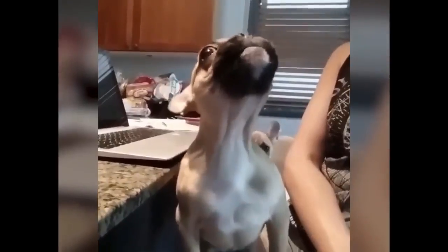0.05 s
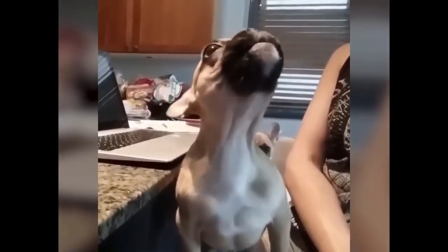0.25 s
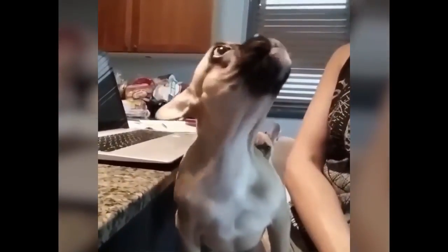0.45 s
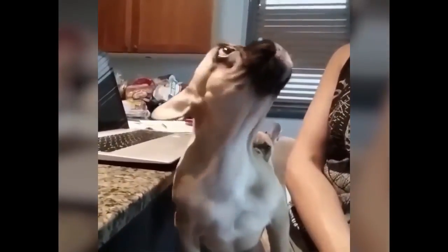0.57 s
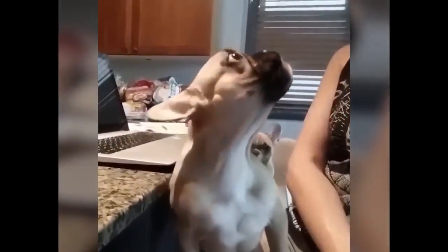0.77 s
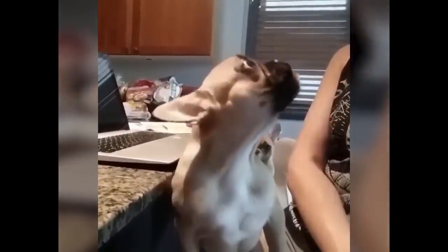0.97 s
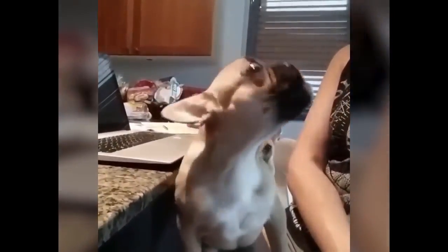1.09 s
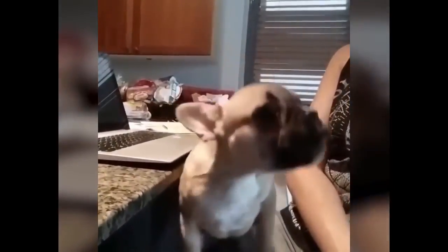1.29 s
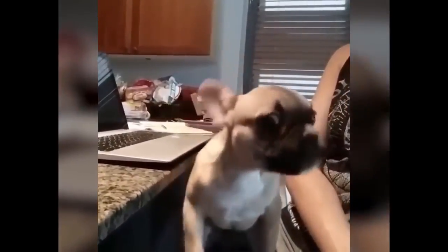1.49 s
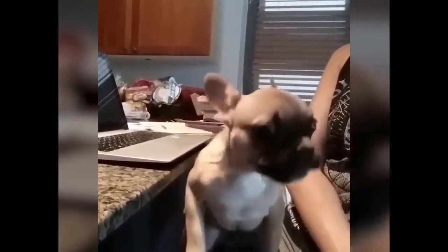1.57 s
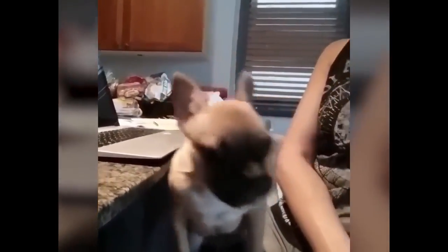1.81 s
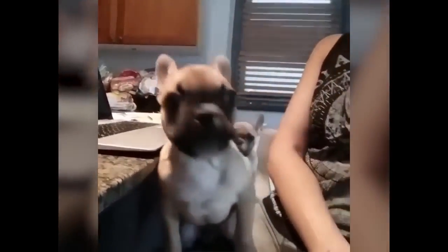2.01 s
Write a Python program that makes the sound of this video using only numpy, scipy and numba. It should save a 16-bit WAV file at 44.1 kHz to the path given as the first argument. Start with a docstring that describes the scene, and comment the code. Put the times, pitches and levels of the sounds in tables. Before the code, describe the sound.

A puppy yowls close to a phone microphone in a small kitchen. After faint room noise and the dying ring of an earlier howl, a hoarse yelp starts at 0.2 s, drops, leaps up again near 0.5 s, then clears into a falling howl until 1.1 s. After a short pause, a rougher, brighter yowl rises and breaks twice from 1.3 to 1.9 s, leaving a short room tail.

```python
"""Puppy yowling in a small kitchen

Two yowls close to a phone's microphone: hoarse onsets, pitch breaks, half-pitch lines, a clear falling howl.
Vocal-fold pulses and breath noise pass through moving mouth, rasp and treble resonances.
The room answers with a short decaying tail, over a faint dull noise floor and the ring of an earlier howl.
The phone turns down the bass under loud sound and cuts the top."""
import sys
import numpy as np
from scipy import signal
from scipy.fft import rfft, irfft
from scipy.io import wavfile
from scipy.ndimage import uniform_filter1d
from numba import njit

SR = 44100
rng = np.random.default_rng(int(sys.argv[2]) if len(sys.argv) > 2 else 0)


def materialize(psi):
    """Save the field psi as 16-bit PCM at rate SR to the path in sys.argv[1].

    A 1-D psi becomes a single channel; in a 2-D psi each row is a channel.
    """
    bounded = np.clip(np.atleast_2d(psi).T, -1, 1)
    quanta = np.round(bounded * 32767).astype(np.int16)
    wavfile.write(sys.argv[1], SR, quanta)


def ratio_of_db(decibels):
    """Turn decibels (scalar or array-like) into linear amplitude factors; 0 dB maps to 1."""
    return 10 ** (np.asarray(decibels, float) / 20)


N = 90404   # length [samples]

# Vocal folds: (time [s], mean pitch [Hz], roughness [0-1], half-pitch lines against pitch lines [dB])
VOCAL_FOLDS = [(.2, 820, 0.75, 23), (.243, 897.5, 0.48, 1), (.275, 670.3, 0.79, 0),
               (.32, 616.2, 0.54, -35.5), (.372, 517, 0.22, -29), (.382, 275.1, 0.3, -33),
               (.462, 396.3, 0.12, -82), (.488, 463.5, 0.13, 3), (.496, 718.5, 0.39, -4),
               (.522, 879.8, 0.05, -0.5), (.56, 771, 0.33, -3.5), (.568, 510.2, 0.41, 7),
               (.614, 500, 0.64, -5.5), (.64, 437, 0.18, -38.5), (.686, 376.2, 0, -38.5),
               (.798, 421.7, 0.08, -39), (.873, 392.7, .02, -65.5), (1.07, 305.8, 0.14, -63.5),
               (1.3, 499.9, 0.7, 14), (1.385, 681.3, 0.82, -23.5), (1.412, 641.5, 0.49, -9),
               (1.424, 472.7, 0.3, -26), (1.456, 423.2, 0.11, -31.5), (1.495, 460.8, 0.27, -9),
               (1.545, 472.9, 0.06, -4.5), (1.558, 570.3, 0.21, -18), (1.605, 766.6, 0.73, -8.5),
               (1.652, 735.2, 0.35, -2), (1.706, 657.2, 0.3, 0), (1.752, 634.6, 0.4, -2.5),
               (1.775, 524.4, 0.5, -28), (1.8, 426.2, 0.06, -31), (1.85, 388.8, 0.1, -34)]
# Effort of the voice: (time [s], mouth level [dB], rasp level [dB], treble level [dB])
EFFORT_LEVELS = [(.202,-90,-87,-88),(.21,-41,-72,-61.5),(.218,-22,-59,-51.5),(.246,-16.5,-40.5,-36),(.268,-22,-25.5,-32.5),
                 (.336,-26.5,-39.5,-37),(.378,-31.5,-48,-48.5),(.448,-27.5,-49,-40),(.485,-21,-40,-36),(.497,-19.5,-27.5,-34),(.526,-14.5,-26,-27.5),
                 (.56,-19.5,-20,-27.5),(.58,-19,-24,-29),(.62,-21.5,-34,-38),(.656,-35,-50,-43),(.72,-29,-63,-45),
                 (.754,-27,-40.5,-46),(.786,-20,-43,-43),(.83,-27,-46.5,-46.5),(.928,-29,-59.5,-52.5),(1.06,-37,-66.5,-60.5),
                 (1.085,-90.5,-88,-68.5),(1.303,-75.5,-100,-100),(1.314,-32.5,-66.5,-66),(1.334,-20.5,-39.5,-46.5),(1.378,-22.5,-35.5,-35),
                 (1.434,-25,-36.5,-35.5),(1.514,-29,-48,-41.5),(1.586,-16.5,-26.5,-27),
                 (1.624,-16,-28,-25.5),(1.648,-25,-26.5,-20.5),(1.704,-21.5,-27.5,-28),(1.764,-22.5,-35.5,-35.5),
                 (1.79,-35.5,-45.5,-38),(1.834,-32,-54,-55),(1.885,-50,-53,-50.5),(1.91,-60,-59.5,-74.5),(2.05,-75,-74.5,-78)]
# Mouth shape: (time [s], first resonance [Hz], its height [dB], second resonance [Hz], its height [dB],
# rasp resonance [Hz])
MOUTH_SHAPE = [(.24,815,20,1376,7.5,3640),(.28,1134,16,1220,3,3600),(.335,597,23,1200,33,3930),
               (.375,556,13.5,1240,-26,3300),(.47,760,3,1950,3,2730),(.525,805,28.5,1150,-2.5,2930),(.585,996,16.5,1340,-1,3044),
               (.7,835,7.5,1790,-9,3220),(.77,784.4,12,1946,19.5,3080),(.84,780,4.5,1980,9,3260),(.9,744,9.5,1497,8,3520),
               (1.07,630,8,1208,-13.5,3550),(1.31,736,7,1082,-2.5,2530),(1.35,960,16.5,1470,12,3200),(1.41,1310,21.5,1670,-17,3300),
               (1.44,924,19,1194,32,3030),(1.47,860,15,1401,17,2340),(1.51,870,9,1670,-1.5,2340),(1.565,833,10,1330,-6,2820),(1.622,1120,26,1620,-1,3640),
               (1.66,810,19,1533,22.5,3500),(1.71,650,5,1270,14.5,2880),(1.76,670,7.5,1090,15,2590),(1.83,816,-8,1520,-17,2800)]
# Treble resonances before the head turns: (mean centre [Hz], width of the first pass [Hz], relative level [dB])
TREBLE_RESONANCES = [(6050,380,-3),(7450,480,-2),(8600,600,-7),(10700,700,-5),(12300,900,-4),(13400,600,-7)]
# Spectrum of the room's noise floor: (frequency [Hz], relative level [dB])
FLOOR_SPECTRUM = [(25, -8), (134, -3.5), (716, -14.5), (831, -31.5), (924, -18.5), (4000, -43.5),
                  (5200, -107)]

# Room and background
EARLIER_HZ, EARLIER_WIDTH_HZ = 820, 74   # ring of an earlier howl; width of each of two passes
EARLIER_START_DB, EARLIER_FALL_DB_PER_S = -60.5, 60.5
FLOOR_DB, FLOOR_SIDE_DB = -61.5, -19   # in the middle; sides against the middle
ROOM_T60_S, ROOM_DB, WALL_CUT_HZ = 0.37, -13, 8800
SIDE_DB, SIDE_LAG_S, SIDE_BASS_DB = -22, .003, -23   # the dog's late upper part and its bass echoes

# Vocal folds and breath
JITTER, JITTER_HZ, SHIMMER_DB, SHIMMER_HZ = .09, 150, 4, 110   # pitch and strength wander at full roughness
LOWEST_HALF_DB = -6   # the lowest half-pitch line is weaker than the others
AIR_DB = -2   # breath noise at full roughness
TREBLE_AIR_DB, STEADY_AIR = 7, .22   # breath feeding the treble; the share that needs no roughness
PULSE_TOP_HZ = 7300   # pulses fade into air above this
GROWL_HZ, GROWL_DB = 194, -30.5

# Mouth and rasp
FIRST_WIDTH_HZ, SECOND_WIDTH_HZ = 245, 167   # of the first pass
THROAT_TILT_HZ, CHEST_HZ, MOUTH_TOP_HZ = 1100, 270, 2120   # throat low-pass; low and high edge of the voice
UPPER_RASP_HZ, UPPER_RASP_DB, RASP_WIDTH_HZ = 4180, -21.5, 260
RASP_AIR, RASP_WIDE_DB = .38, -11   # share of air in the rasp resonance; broad air around it
RASP_FADES_DB = -42   # below this mouth level the rasp resonance loses to the air around it
CLEAR_TOP_HZ = 3850   # upper edge of the rasp in a clear voice before the turn

# Treble, and the turn of the head between the yowls
TREBLE_FROM_HZ, TREBLE_WANDER, TREBLE_WANDER_HZ = 5400, .012, 11
TURN_S, TURN_DB_PER_KHZ = 1.26, 1.3   # the second yowl is brighter
RING_FOLLOWS, RING_FROM_DB = 1, -26.5   # lowest treble resonance: dB lost per dB of voice below this level
DIP_HZ, TURNED_DIP_HZ, DIP_WIDTH_HZ = 4950, 6150, 1300   # dip in the voice's spectrum, higher after the turn
DIP_FILL = 2.2   # how readily hoarseness fills the dip and opens the rasp before the turn

# Phone
DUCK_HZ, DUCK_FROM_DB, DUCK_RATIO, DUCK_S = 176, -34.5, 0.55, 0.03   # ratio: bass dB lost per dB of excess
TOP_STOP_HZ = 14200   # the top is down 26 dB from here


def rms_one(x):
    """Scale to rms 1."""
    return x / np.sqrt(np.mean(x ** 2) + 1e-20)


def in_time(rows):
    """Columns of a table, joined by straight lines sample by sample."""
    s, *columns = np.transpose(rows)
    return [np.interp(np.arange(N) / SR, s, c) for c in columns]


def cut(x, hz, kind, order=2):
    """Butterworth filter."""
    return signal.sosfilt(signal.butter(order, hz, kind, fs=SR, output="sos"), x)


def drift(hz):
    """Smooth random wandering of rms 1, slower than hz."""
    return rms_one(cut(rng.standard_normal(N), hz, "low"))


def evened(x):
    """Level held near 1, followed over some 30 ms."""
    power = uniform_filter1d(uniform_filter1d(x ** 2, size=1300), size=700)
    return x / np.sqrt(power + 1e-12)


@njit
def sweep(x, c, r):
    """Two-pole resonance with a moving centre: c is the cosine of its angle, r the pole radius."""
    y = np.zeros(len(x))
    for i in range(2, len(x)):
        y[i] = (1 - r * r) / 2 * (x[i] - x[i - 2]) + 2 * r * c[i] * y[i - 1] - r * r * y[i - 2]
    return y


def resonance(x, hz, width_hz):
    """A resonance with gain 1 on top; its centre may be fixed or move."""
    return sweep(x, np.cos(2 * np.pi * hz / SR) * np.ones(N), np.exp(-np.pi * width_hz / SR))


def twice(x, hz, width_hz):
    """A steep resonance: two passes, the second twice as wide."""
    return resonance(resonance(x, hz, width_hz), hz, 2 * width_hz)


def earlier_howl():
    """The dying ring of a howl from just before: narrow noise falling steadily in level."""
    ring = rng.standard_normal(N)
    for _ in range(2):
        ring = resonance(ring, EARLIER_HZ, EARLIER_WIDTH_HZ)
    return rms_one(ring) * ratio_of_db(EARLIER_START_DB - EARLIER_FALL_DB_PER_S * np.arange(N) / SR)


def floor():
    """Dull room noise: white noise shaped to the floor spectrum."""
    hz, db = np.transpose(FLOOR_SPECTRUM)
    f = np.arange(N // 2 + 1) * SR / N + 1
    shape = ratio_of_db(np.interp(np.log(f), np.log(hz), db))
    return rms_one(irfft(rfft(rng.standard_normal(N)) * shape, N))


def vocal_folds():
    """Pulses wavering in period and strength, with half-pitch lines; breath and growl gated by each cycle."""
    hz, rough, half_db = in_time(VOCAL_FOLDS)
    # phase at half the pitch: even multiples are pitch lines, odd ones half-pitch lines
    phase = np.cumsum(np.pi * hz * (1 + JITTER * rough * drift(JITTER_HZ)) / SR)
    pulses = np.zeros(N)
    for k in range(1, 50):
        gain = ratio_of_db(half_db + LOWEST_HALF_DB * (k == 1)) if k % 2 else 1
        pulses += gain * np.cos(k * phase) * (k * hz < SR * .7)
    pulses = evened(pulses) * ratio_of_db(SHIMMER_DB * rough * drift(SHIMMER_HZ))
    air = rng.standard_normal((3, N)) * (1 + 1.07 * np.cos(2 * phase))
    voice = pulses + ratio_of_db(AIR_DB) * rough * air[0]
    hiss = cut(pulses, PULSE_TOP_HZ, "low", order=6) + ratio_of_db(TREBLE_AIR_DB) * (rough + STEADY_AIR) * air[1]
    growl = rough * ratio_of_db(half_db) * rms_one(twice(air[2], GROWL_HZ, 94))
    return voice, hiss, growl, pulses


def mouth(voice):
    """Two moving mouth resonances beside the throat's low-pass sound, held between the voice's edges."""
    first_hz, first_db, second_hz, second_db, _ = in_time(MOUTH_SHAPE)
    x = cut(voice, THROAT_TILT_HZ, "low")
    x = x + ratio_of_db(first_db) * twice(voice, first_hz, FIRST_WIDTH_HZ)
    x = x + ratio_of_db(second_db) * twice(voice, second_hz, SECOND_WIDTH_HZ)
    return cut(cut(x, CHEST_HZ, "high", order=4), MOUTH_TOP_HZ, "low", order=6)


def rasp(hiss, pulses, hoarse, open_top, db):
    """A moving resonance of pulses and air, with a fixed one and broad air that grow with hoarseness."""
    rasp_hz = in_time(MOUTH_SHAPE)[-1]
    source = RASP_AIR * hiss + (1 - RASP_AIR) * pulses
    moving = twice(source, rasp_hz, RASP_WIDTH_HZ) * ratio_of_db(np.minimum(db - RASP_FADES_DB, 0))
    upper = ratio_of_db(UPPER_RASP_DB) * hoarse * twice(hiss, UPPER_RASP_HZ, RASP_WIDTH_HZ)
    broad = ratio_of_db(RASP_WIDE_DB) * np.sqrt(hoarse) * cut(hiss, [2200, 5600], "band", order=4)
    x = moving + upper + broad
    return open_top * x + (1 - open_top) * cut(x, CLEAR_TOP_HZ, "low", order=8)


def treble(hiss, turned, db):
    """Slightly wandering high resonances; the lowest swells with the voice and is 20 dB weaker after the turn."""
    ring_db = RING_FOLLOWS * np.minimum(db - RING_FROM_DB, 0) - 20 * turned
    x = np.zeros(N)
    for k, (hz, width_hz, level_db) in enumerate(TREBLE_RESONANCES):
        gain = ratio_of_db(level_db + TURN_DB_PER_KHZ * hz / 1000 * turned + ring_db * (k == 0))
        centre_hz = hz * (1 + TREBLE_WANDER * drift(TREBLE_WANDER_HZ))
        x += gain * twice(hiss, centre_hz, width_hz)
    return cut(x, TREBLE_FROM_HZ, "high", order=8)


def puppy():
    """Folds through mouth, rasp and treble, each at its own effort; then a dip that hoarseness fills in."""
    voice, hiss, growl, pulses = vocal_folds()
    hoarse = in_time(VOCAL_FOLDS)[1]
    lately = uniform_filter1d(hoarse, size=6000)   # hoarseness over a seventh of a second
    turned = np.arange(N) > TURN_S * SR
    db, rasp_db, treble_db = in_time(EFFORT_LEVELS)
    open_top = np.clip(DIP_FILL * lately + turned, 0, 1)
    dog = ratio_of_db(db) * (evened(mouth(voice)) + ratio_of_db(GROWL_DB) * growl)
    dog = dog + ratio_of_db(rasp_db) * evened(rasp(hiss, pulses, hoarse, open_top, db))
    dog = dog + ratio_of_db(treble_db) * evened(treble(hiss, turned, db))
    dip_hz = np.where(turned, TURNED_DIP_HZ, DIP_HZ)
    depth = np.clip(1 - np.where(turned, hoarse, DIP_FILL * lately), 0, 1)
    for _ in range(2):
        dog = dog - depth * resonance(dog, dip_hz, DIP_WIDTH_HZ)
    return dog


def kitchen(x, cut_hz):
    """Dense dull echoes that die away: low-passed noise under an exponential decay."""
    t = np.arange(SR) / SR
    tail = cut(rng.standard_normal(SR), cut_hz, "low") * ratio_of_db(-60 * t / ROOM_T60_S) * (t > .004)
    return signal.fftconvolve(x, tail / np.sqrt(np.sum(tail ** 2)))[:N]


def scene():
    """Dog in the middle of the stereo picture, a little of it and of the room to the sides."""
    dog = puppy()
    mid = dog + ratio_of_db(ROOM_DB) * kitchen(dog, WALL_CUT_HZ) + ratio_of_db(FLOOR_DB) * floor() + earlier_howl()
    side = ratio_of_db(SIDE_DB) * np.roll(cut(dog, 2600, "high"), int(SIDE_LAG_S * SR))
    side = side + ratio_of_db(SIDE_BASS_DB) * kitchen(cut(dog, 160, "low"), 3000)
    side = side + ratio_of_db(FLOOR_DB + FLOOR_SIDE_DB) * floor()
    return np.array([mid + side, mid - side])


def band_limit(x):
    """A steep low-pass at the top of the band."""
    return signal.sosfilt(signal.butter(12, 15880, fs=SR, output="sos"), x)


def record(dry):
    """The phone ducks the bass under loud sound and cuts the top."""
    power = uniform_filter1d(np.mean(dry ** 2, axis=0), size=int(DUCK_S * SR))
    level_db = 10 * np.log10(power + 1e-12)
    duck = ratio_of_db(-DUCK_RATIO * np.maximum(level_db - DUCK_FROM_DB, 0))
    f = np.arange(N // 2 + 1) * SR / N
    bass = irfft(rfft(dry) / (1 + (f / DUCK_HZ) ** 8), N)
    ducked = dry - (1 - duck) * bass
    mix = signal.sosfilt(signal.cheby2(10, 26, TOP_STOP_HZ, fs=SR, output="sos"), ducked)
    return band_limit(mix)


dry = scene()
out = record(dry)
materialize(out)
```